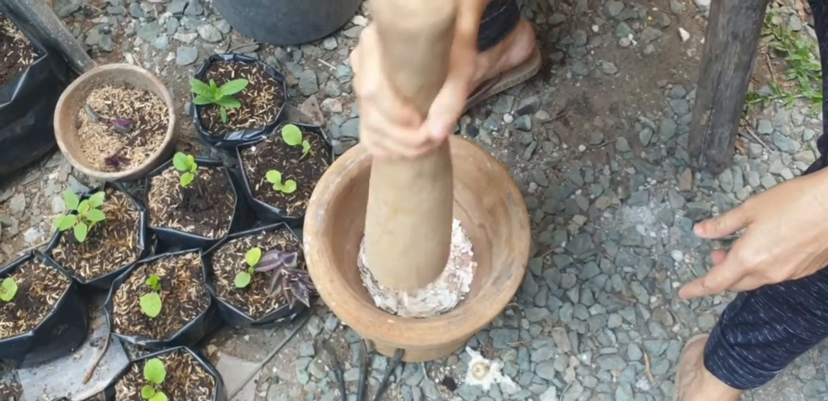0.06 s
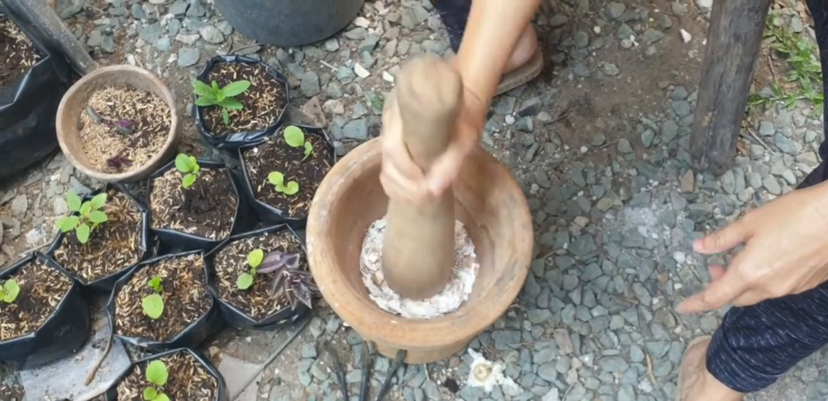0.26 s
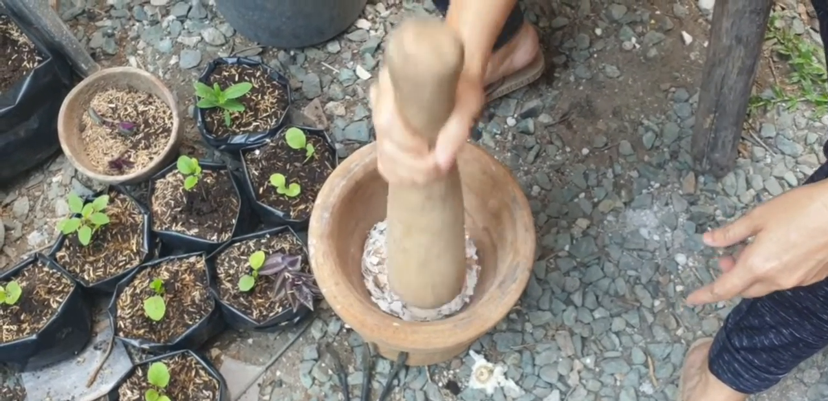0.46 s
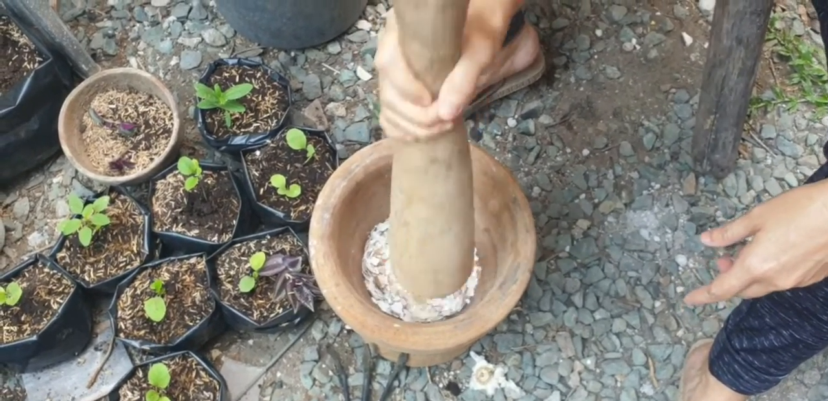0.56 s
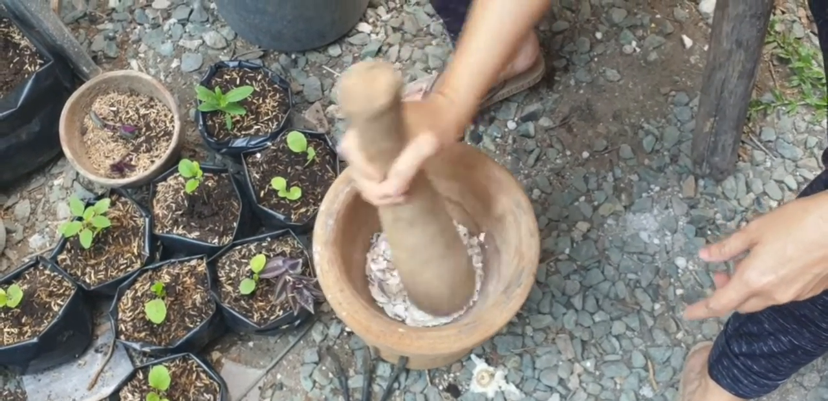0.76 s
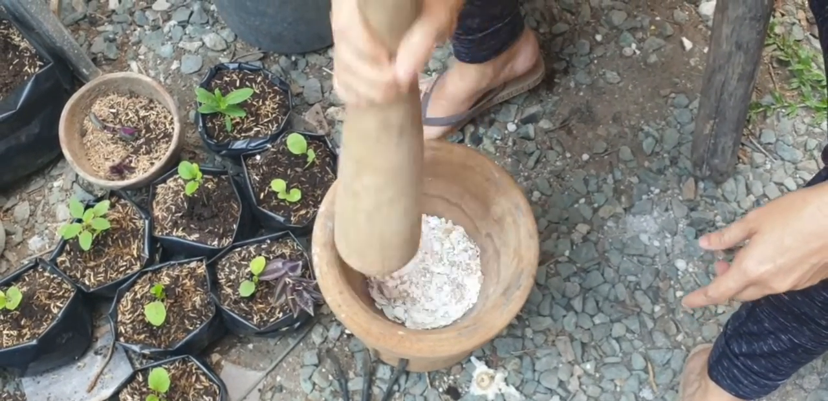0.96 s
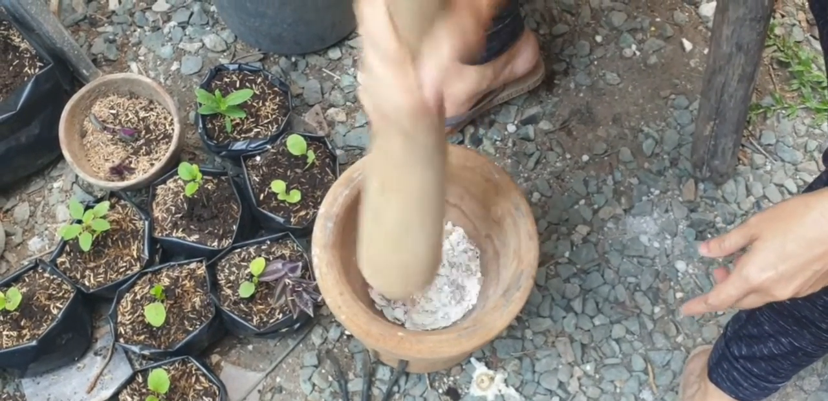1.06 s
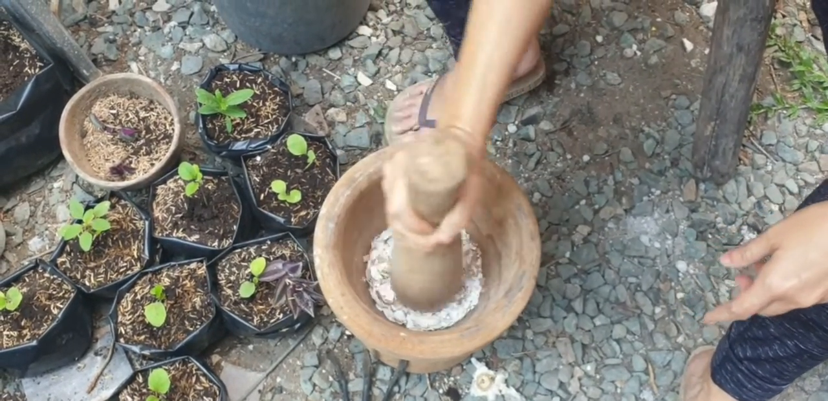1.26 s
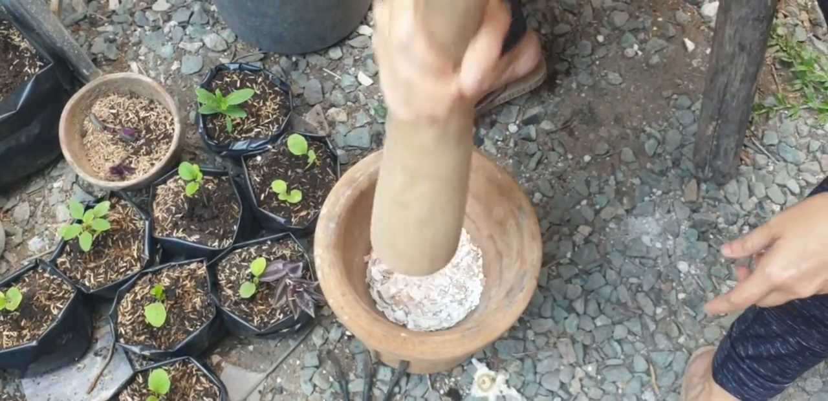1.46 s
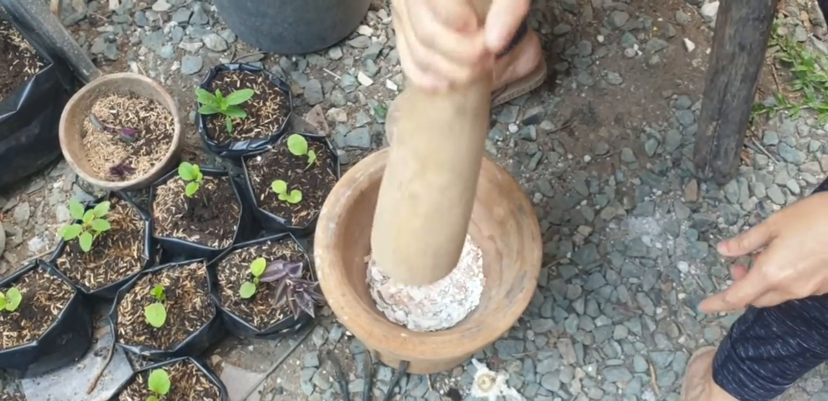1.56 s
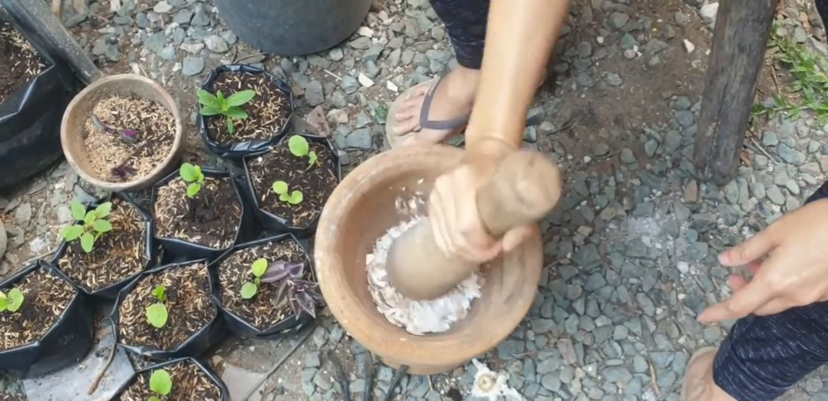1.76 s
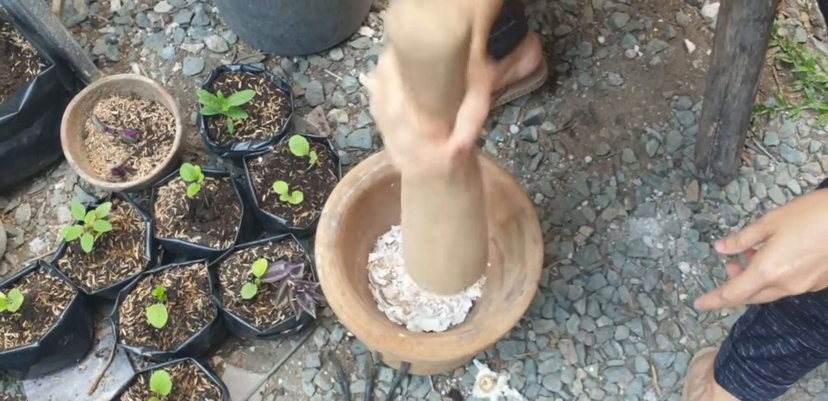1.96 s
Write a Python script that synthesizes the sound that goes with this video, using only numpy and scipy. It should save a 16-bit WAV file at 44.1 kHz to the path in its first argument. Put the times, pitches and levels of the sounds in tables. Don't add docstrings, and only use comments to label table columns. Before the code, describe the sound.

Close up outdoors, after a light tap, four steady woody blows thud in a clay bowl with gritty shell crunch and trickling bits, over short wall reflections, faint far chirps and a low breeze rumble.

```python
import sys
import numpy as np
from scipy import signal
from scipy.fft import rfft, irfft
from scipy.io import wavfile
from scipy.ndimage import uniform_filter1d

SR = 44100
rng = np.random.default_rng(int(sys.argv[2]) if len(sys.argv) > 2 else 0)


def master(y):
    cut = np.clip(np.atleast_2d(y).T, -1, 1)
    pcm = np.round(cut * 32767)
    wavfile.write(sys.argv[1], SR, pcm.astype(np.int16))


def attenuation_scalar(level_db):
    decades = np.asarray(level_db, float) / 20
    return 10 ** decades


N = 88200
T = np.arange(N) / SR


def rms_one(x):
    return x / np.sqrt(np.mean(x ** 2) + 1e-20)


def pan(db):
    return attenuation_scalar(db * np.array([[1], [-1]]))


def at_hz(points, hz):
    table_hz, value = np.transpose(points)
    return np.interp(np.log(hz), np.log(table_hz), value)


def colour(x, spectrum):
    hz = np.fft.rfftfreq(N, 1 / SR) + 1
    return rms_one(irfft(rfft(x) * attenuation_scalar(at_hz(spectrum, hz)), N))


def lowpass(x, hz):
    return signal.sosfilt(signal.butter(2, hz, fs=SR, output="sos"), x)


def bandpass(x, low_hz, high_hz):
    return signal.sosfilt(signal.butter(2, [low_hz, high_hz], "band", fs=SR, output="sos"), x)


def ring(x, hz, t60):
    radius = attenuation_scalar(-60 / (t60 * SR))
    turn = 2 * np.pi * hz / SR
    return signal.lfilter([0, np.sin(turn)], [1, -2 * radius * np.cos(turn), radius ** 2], x + 1e-18)


def resonate(x, hz, t60):
    return ring(x, hz, t60) * 2 * np.log(1000) / (t60 * SR)


def fall(start_s, fall_s):
    return (T >= start_s) * np.exp(-np.maximum(T - start_s, 0) / fall_s)


def swell(start_s, rise_s):
    phase = np.maximum(T - start_s, 0) / rise_s
    return phase * np.exp(1 - phase)


def pair(alike):
    mid, side = rng.standard_normal((2, N))
    return np.sqrt(1 + alike) * mid + np.sqrt(1 - alike) * side * [[1], [-1]]


# time_s, level_db
WIND = [(0.0, -58.5), (0.21, -74.5), (0.24, -43), (0.31, -57.5), (0.57, -42), (0.65, -61), (0.7, -47.5),
        (0.81, -61.5), (1.1, -63.5), (1.24, -39), (1.27, -61), (1.5, -59), (1.54, -39), (1.59, -72),
        (1.69, -83.5), (1.73, -49.5), (1.78, -61.5), (2.0, -81)]
WIND_HZ, WIND_LUMP_HZ = 70.4, 14.0
WIND_LUMP_DB, WIND_PAN_DB, WIND_TRIM_DB = 2.5, -7.5, -8


def wind():
    lumps = rms_one(lowpass(rng.standard_normal((2, N)), WIND_LUMP_HZ))
    rumble = rms_one(bandpass(rng.standard_normal((2, N)), WIND_HZ * 0.72, WIND_HZ * 0.89))
    level_db = np.interp(T, *np.transpose(WIND)) + WIND_TRIM_DB
    return rumble * attenuation_scalar(level_db + WIND_LUMP_DB * lumps) * pan(WIND_PAN_DB)


# pitch_hz, level_db (per Hz)
AIR = [(59, -49), (100, -0.5), (358, -5.5), (547, -11), (1520, -33.5), (2470, -28), (3320, -46),
       (7450, -35.5), (16000, -45.5)]
AIR_DB, AIR_ALIKE = -63, 1


def air():
    return attenuation_scalar(AIR_DB) * colour(pair(AIR_ALIKE), AIR)


def push(s, db, contact_s):
    phase = np.clip((T - np.reshape(s, (-1, 1))) / contact_s, 0, 1)
    pulses = np.sin(np.pi * phase) ** 2 * 2 / (contact_s * SR)
    return attenuation_scalar(db) @ pulses


MODE_SCATTER_DB = 3.5


def modes(table, s, db, contact_s):
    scatter = MODE_SCATTER_DB * rng.standard_normal((len(s), len(table)))
    out = 0
    for k, (hz, left_db, right_db, t60) in enumerate(table):
        tone = ring(push(s, db + scatter[:, k], contact_s), hz, t60)
        out = out + (-1) ** k * attenuation_scalar(np.array([[left_db], [right_db]])) * tone
    return out


def mic_low_cut(x):
    return signal.sosfilt(signal.butter(2, 150, "high", fs=SR, output="sos"), x)


# pitch_hz, left_db, right_db, fade60_s
TAP_MODES = [(283.1, -18.5, -20, 0.15), (482, 2.5, 3, 0.027), (590.5, -11, -8, 0.12),
             (980, -9.5, -6.5, .05), (1300, -26.5, -9, 0.055), (1353, -14.5, -6.5, 0.018),
             (1840, -19, -16, 0.11), (2460, -19.5, -22, 0.017), (3270, -23, -19.5, .02),
             (7800, -12, -6, 0.038)]
TAP_S, TAP_CONTACT_S, TAP_DB = .0254, .00033, -22.5


def first_tap():
    return mic_low_cut(modes(TAP_MODES, np.array([TAP_S]), TAP_DB, TAP_CONTACT_S))


BLOW_S = np.array([.23467, .69503, 1.19034, 1.72798])
# knock_db, rim_db, crunch_db, splinters_db
BLOWS = [
    (2, 4.5, -38.5, -61.5),
    (2.67, 0, -29, -53.5),
    (1.85, 8, -42, -62.5),
    (1.82, -0.5, -30, -56),
]
# pitch_hz, level_db (per Hz)
CLACK = [(410, -35.5), (700, 8), (1010, -9), (1340, -2.5), (1560, -23), (1880, -6), (4500, -36.5),
         (5850, -63), (9900, -120)]
CLACK_DB, CLACK_FALL_S, TAP_CLACK_DB = -34, 0.015, -41.5
RIM_DELAY_S = 0.001307


def clack():
    level = attenuation_scalar(TAP_CLACK_DB) * fall(TAP_S, CLACK_FALL_S)
    for s, (_, rim_db, _, _) in zip(BLOW_S, BLOWS):
        level = level + attenuation_scalar(CLACK_DB + rim_db) * fall(s + RIM_DELAY_S, CLACK_FALL_S)
    soft_start = uniform_filter1d(level, size=30, origin=14)
    return mic_low_cut(soft_start * colour(pair(.3), CLACK))


# pitch_hz, left_db, right_db, fade60_s
BOWL_MODES = [(173, -29, -28, 0.039), (190.5, -28.5, -22.5, 0.04), (258, -30, -28, 0.018),
              (359.2, -26.5, -26, 0.013), (685, -31.5, -30, .025), (795, -32.5, -33, 0.016)]
KNOCK_DB, PUSH_S = 3.5, .001
HOLLOW_HZ, HOLLOW_T60_S = 570, .018
CLAY_HZ, CLAY_T60_S = 490, .028


def bowl_knock():
    s, knock_db = np.array(BLOW_S), np.array(BLOWS)[:, 0]
    hollow = resonate(push(s, knock_db, PUSH_S), HOLLOW_HZ, HOLLOW_T60_S)
    clay = attenuation_scalar(KNOCK_DB) * ring(hollow, CLAY_HZ, CLAY_T60_S)
    return mic_low_cut(-(clay + modes(BOWL_MODES, s, knock_db, PUSH_S)))


# pitch_hz, left_db, right_db, fade60_s
RIM_MODES = [(1140, -42, -42.5, 0.026), (1299, -38.5, -25.5, 0.014), (1874, -43.5, -32.5, 0.074),
             (2045, -46, -31.5, 0.071), (2780, -41, -53, 0.01), (3200, -55, -54, 0.036),
             (4360, -56.5, -53.5, .03), (5160, -56, -51, .025)]
RIM_CONTACT_S = 0.00017


def rim_ring():
    rim_db = np.array(BLOWS)[:, 1]
    return mic_low_cut(modes(RIM_MODES, np.array(BLOW_S) + RIM_DELAY_S, rim_db, RIM_CONTACT_S))


CRACKS_PER_S, CRACK_SPREAD_DB, SHELL_PAN_DB = 6300, 6.5, 0.5
SHELL_SIDE = .35


def cracks(spectrum):
    size = attenuation_scalar(CRACK_SPREAD_DB * np.minimum(rng.exponential(1, (2, N)), 4))
    size = size * rng.choice([-1, 1], (2, N))
    snaps = size * (rng.random((2, N)) < CRACKS_PER_S / SR)
    both_ports = snaps[0] + SHELL_SIDE * snaps[1] * [[1], [-1]]
    return colour(both_ports, spectrum) * pan(SHELL_PAN_DB)


PATCH_DB, PATCH_HZ = -1, 25.0


def patches():
    return attenuation_scalar(PATCH_DB * rms_one(lowpass(rng.standard_normal(N), PATCH_HZ)))


# pitch_hz, level_db (per Hz)
CRUNCH = [(880, -33.5), (1500, -4), (2040, 0.5), (3150, -8), (9560, -2.5), (11300, -5.5), (13500, -3),
          (16000, -14)]
CRUNCH_LEAD_S, CRUNCH_RISE_S, CRUNCH_FALL_S, CRUNCH_PEAK_S = .005, 0.0028, 0.0031, 0.0021
CRUNCH_PAN_DB = -5.5


def crunch():
    level = 0
    for s, (_, _, crunch_db, _) in zip(BLOW_S, BLOWS):
        peak = s + CRUNCH_PEAK_S
        rise = (T > s - CRUNCH_LEAD_S) * (T < peak) * np.exp(np.minimum(T - peak, 0) / CRUNCH_RISE_S)
        level = level + attenuation_scalar(crunch_db) * (rise + fall(peak, CRUNCH_FALL_S))
    return level * cracks(CRUNCH) * pan(CRUNCH_PAN_DB)


# pitch_hz, level_db (per Hz)
SPLINTERS = [(1760, -29.5), (3000, -3), (3750, -1.5), (5520, -14.5), (6670, -10.5), (10900, -9),
             (15100, -16), (16000, -9)]
SLIDE_S = [.476, .492, .53, .083, .658]
# level_db, fall_s
SLIDES = [
    (-67, 0.014),
    (-62.5, 0.01),
    (-68.5, .05),
    (-78.5, 0.0087),
    (-76.5, .006),
]
SPLINTER_FAST_S, SPLINTER_SLOW_S, SPLINTER_SLOW_DB = 0.053, 0.073, 0.5


def splinters():
    level = 0
    for s, (_, _, _, splinter_db) in zip(BLOW_S, BLOWS):
        slow = attenuation_scalar(SPLINTER_SLOW_DB) * fall(s, SPLINTER_SLOW_S)
        level = level + attenuation_scalar(splinter_db) * (fall(s, SPLINTER_FAST_S) + slow)
    for s, (db, fall_s) in zip(SLIDE_S, SLIDES):
        level = level + attenuation_scalar(db) * fall(s, fall_s)
    return level * patches() * cracks(SPLINTERS)


def shells():
    left, right = crunch() + splinters()
    return np.array([np.roll(left, 6), right])


# start_s, rise_s, pitch_hz, width_hz
CHIRPS = [
    (.1, .016, 6550, 400),
    (.49, .01, 6000, 400),
    (1.62, .04, 2400, 260),
    (1.84, .025, 3900, 300),
    (.72, .06, 2700, 250),
    (.11, .025, 5800, 200),
    (1.255, .02, 13500, 4000),
    (1.34, .015, 13500, 3000),
    (1.77, .04, 13500, 5000),
    (.76, .04, 4100, 600),
]
CHIRP_DB = [-68, -69.5, -72, -68, -70.5, -76, -69.5, -73, -65, -67]


def chirps():
    out = 0
    for (s, rise_s, hz, width_hz), db in zip(CHIRPS, CHIRP_DB):
        t60 = 2.2 / width_hz
        tone = ring(ring(rng.standard_normal((2, N)), hz, t60), hz, t60)
        out = out + attenuation_scalar(db) * swell(s, rise_s) * rms_one(tone)
    return out


# pitch_hz, level_db (per Hz)
GRIT = [(410, -51), (700, -11), (1020, -5), (1490, -20.5), (2130, -34), (2660, -9), (3300, -30.5),
        (4310, -16.5), (9000, -32), (11700, -58.5), (19800, -120)]
SLUMP_S = [.25, .47, .71, .86, 1.205, 1.75]
# level_db, swell_s
SLUMPS = [
    (-58.5, 0.013),
    (-70, 0.035),
    (-66.5, 0.099),
    (-69, 0.046),
    (-60, 0.017),
    (-60.5, 0.035),
]


def slumps():
    level = sum(attenuation_scalar(db) * swell(s, swell_s) for s, (db, swell_s) in zip(SLUMP_S, SLUMPS))
    return level * patches() * cracks(GRIT)


# delay_s, level_db
ECHOES_LEFT = [(.00187, -9), (.006, -15.5), (.0075, -3.5), (.0114, -15), (.0129, -11), (.0165, -14),
               (.0333, -18)]
ECHOES_RIGHT = [(.00187, -8), (.0075, -8), (.0125, -16), (.0184, -20.5), (.0263, -22), (.0314, -17)]
ECHO_CUT_HZ = 3400


def echoes(x):
    out = x.copy()
    dull = signal.lfilter(*signal.butter(1, ECHO_CUT_HZ, fs=SR), x)
    for port, table in enumerate([ECHOES_LEFT, ECHOES_RIGHT]):
        for delay_s, db in table:
            lag = round(delay_s * SR) - 2
            out[port, lag:] += attenuation_scalar(db) * dull[port, :-lag]
    return out


# pitch_hz, fade60_s
YARD_T60 = [(200, 0.43), (500, 0.43), (1100, .45), (2000, 0.43), (3200, 0.37), (8000, .3)]
# pitch_hz, level_db
YARD_COLOUR = [(185, 13), (260, 0.5), (440, -0.5), (560, -1.5), (1000, 3), (1500, 3.5), (3000, 7.5),
               (8000, 3.5)]
YARD_DB, YARD_GAP_S, YARD_ALIKE = -7, 0.016, 0.9


def yard(x):
    noise, echo = pair(YARD_ALIKE), 0
    edges = 85 * 2 ** np.arange(0, 8, .4)
    for low, high in zip(edges, edges[1:]):
        hz = np.sqrt(low * high)
        decay = np.exp(-np.log(1000) * T / at_hz(YARD_T60, hz))
        echo = echo + attenuation_scalar(at_hz(YARD_COLOUR, hz)) * bandpass(noise, low, high) * decay
    echo = echo * np.clip(T / YARD_GAP_S, 0, 1) ** 2 / np.sqrt(SR / 20)
    return attenuation_scalar(YARD_DB) * signal.fftconvolve(echo, x[None], axes=1)[:, :N]


WET_DB = [-4.5, 4.5, -1, 5.5, 0]
POT_HZ, POT_T60_S, POT_DB = 562, 0.26, -2
RIM_WET_DB, CLACK_WET_DB = -13, 2


def scene():
    background = wind() + air()
    tap, clacks, body, rim, shell = first_tap(), clack(), bowl_knock(), rim_ring(), shells()
    near = echoes(body + rim + clacks) + tap + shell + slumps()
    pot = attenuation_scalar(POT_DB) * resonate(body, POT_HZ, POT_T60_S)
    sent = body + pot + tap + attenuation_scalar(RIM_WET_DB) * rim + attenuation_scalar(CLACK_WET_DB) * clacks + shell
    wet = attenuation_scalar(np.array(WET_DB)[np.searchsorted(np.array(BLOW_S) - .01, T)])
    return near + yard(wet * sent.mean(axis=0)) + chirps() + background


def roll_off(x):
    return signal.sosfilt(signal.butter(12, 16620, fs=SR, output="sos"), x)


CUTOFF_HZ = 16800


def record(dry):
    cut = signal.sosfilt(signal.cheby2(12, 60, CUTOFF_HZ, fs=SR, output="sos"), dry)
    return roll_off(cut)


dry = scene()
out = record(dry)
master(out)
```